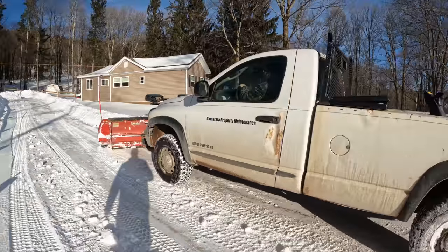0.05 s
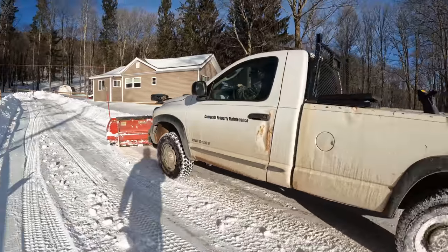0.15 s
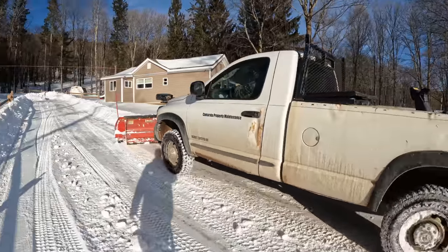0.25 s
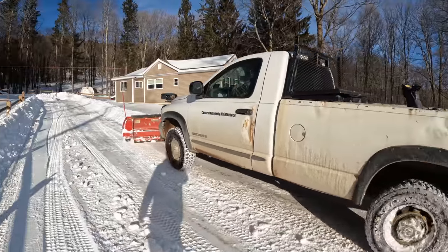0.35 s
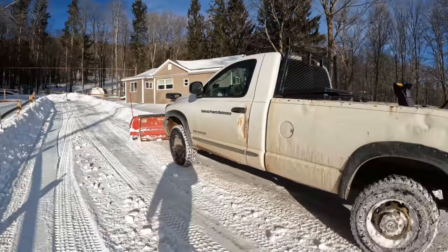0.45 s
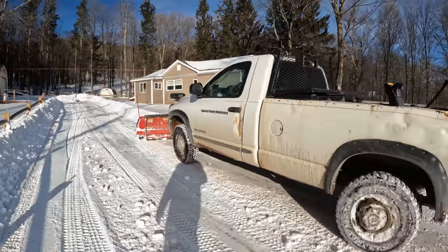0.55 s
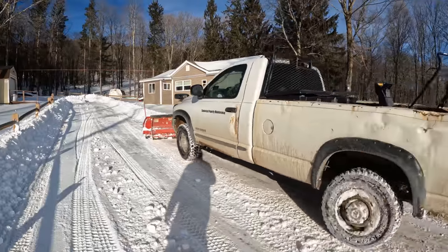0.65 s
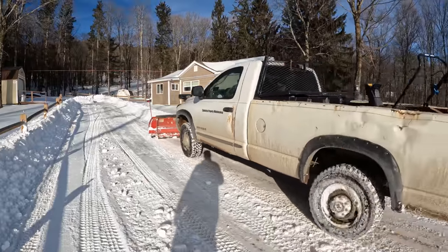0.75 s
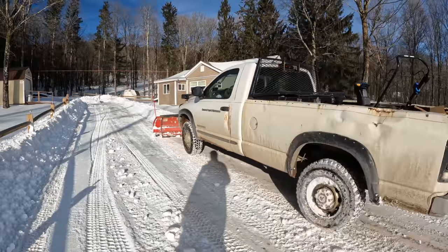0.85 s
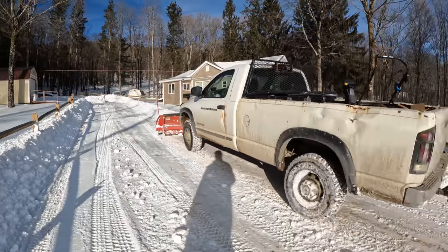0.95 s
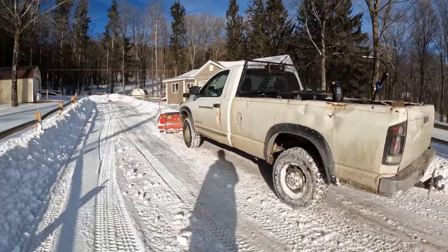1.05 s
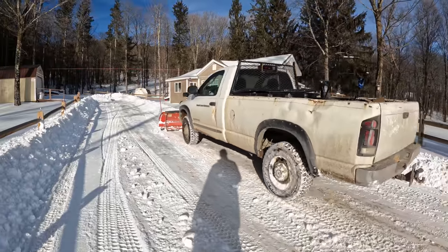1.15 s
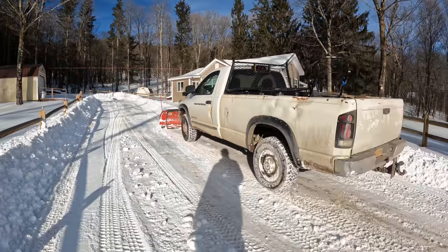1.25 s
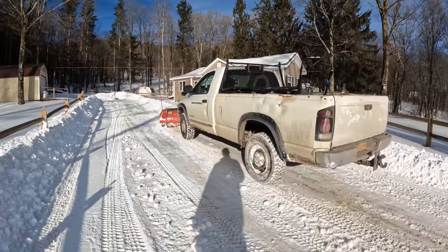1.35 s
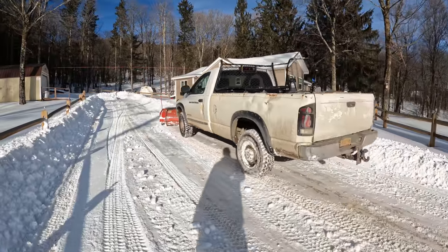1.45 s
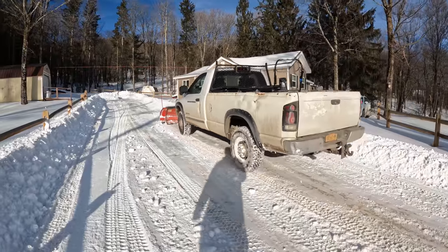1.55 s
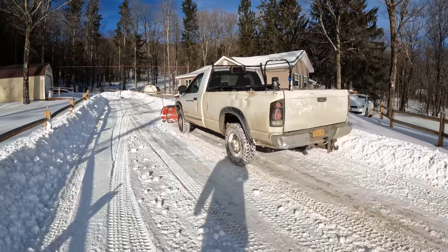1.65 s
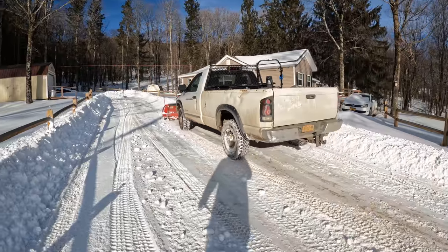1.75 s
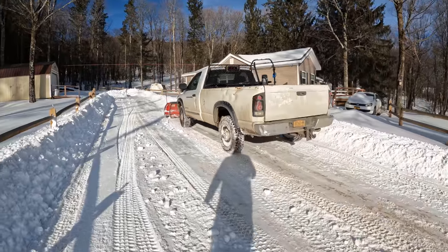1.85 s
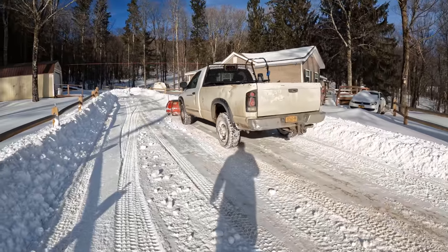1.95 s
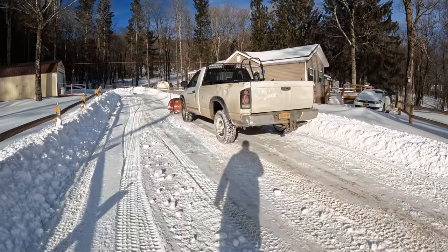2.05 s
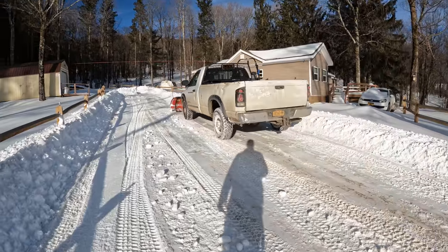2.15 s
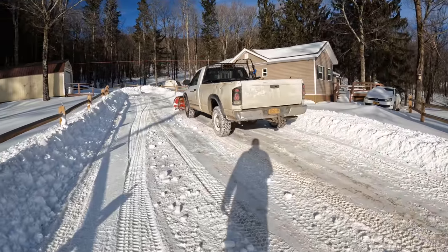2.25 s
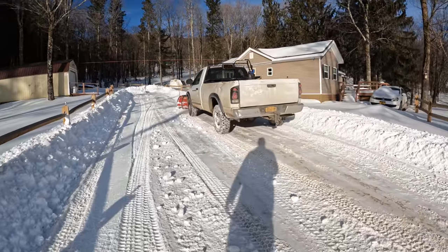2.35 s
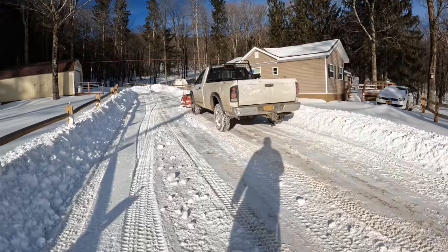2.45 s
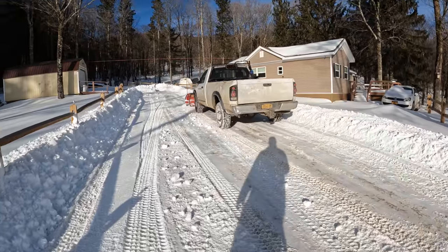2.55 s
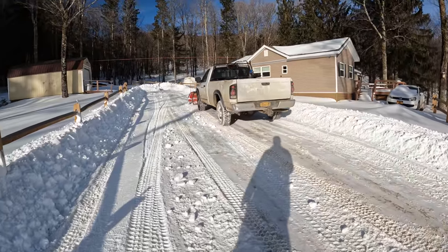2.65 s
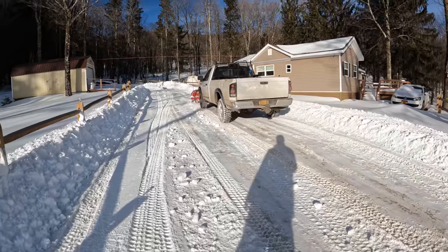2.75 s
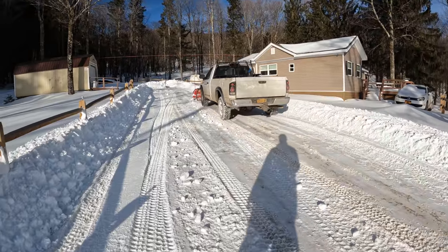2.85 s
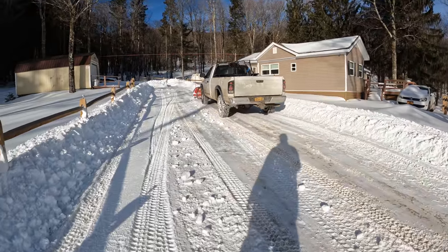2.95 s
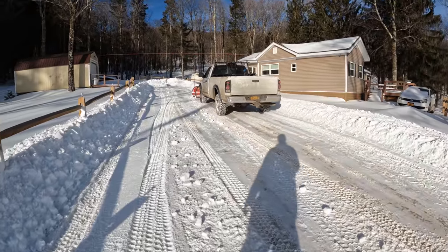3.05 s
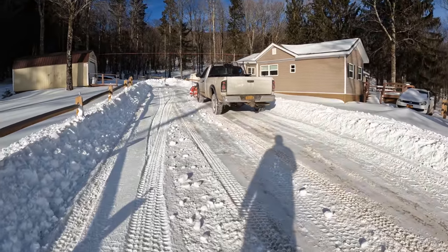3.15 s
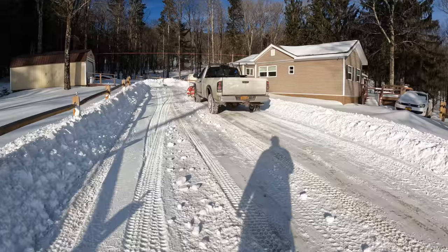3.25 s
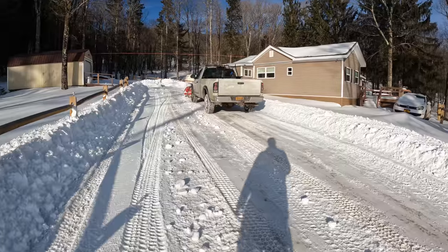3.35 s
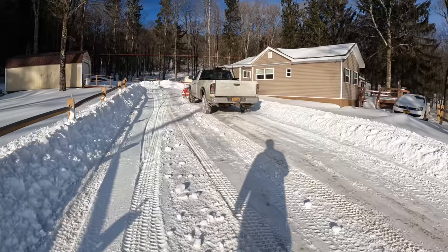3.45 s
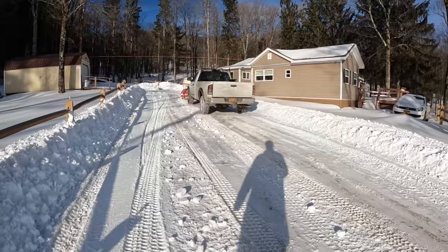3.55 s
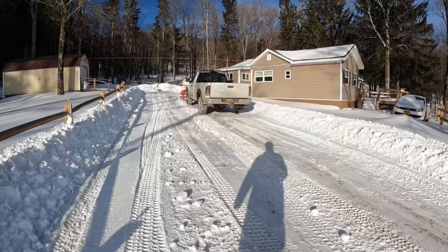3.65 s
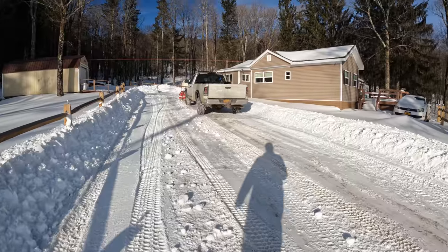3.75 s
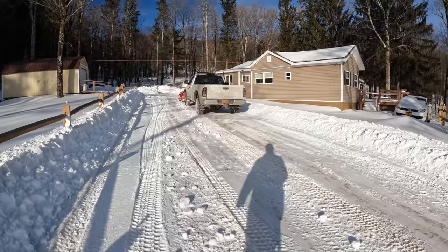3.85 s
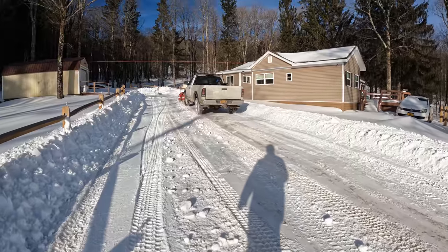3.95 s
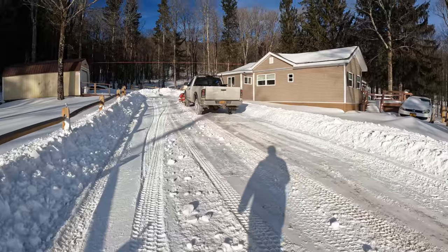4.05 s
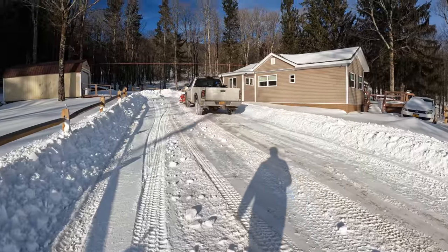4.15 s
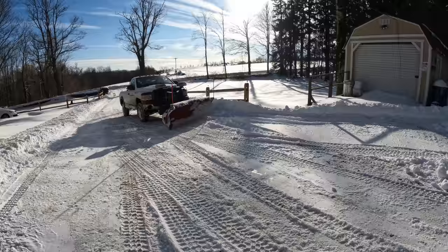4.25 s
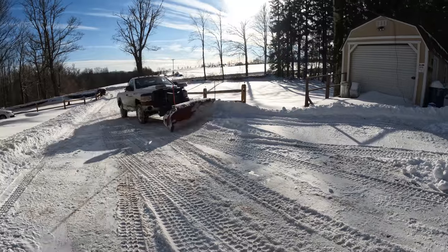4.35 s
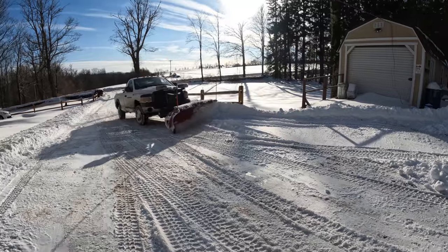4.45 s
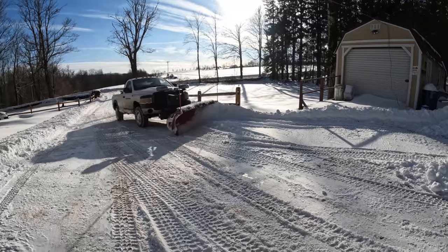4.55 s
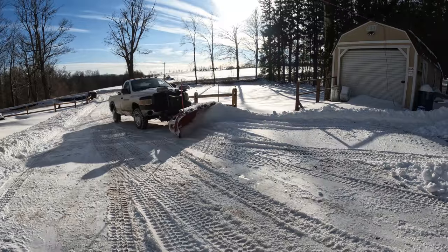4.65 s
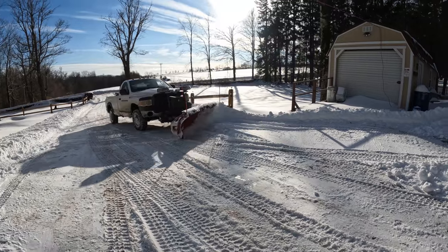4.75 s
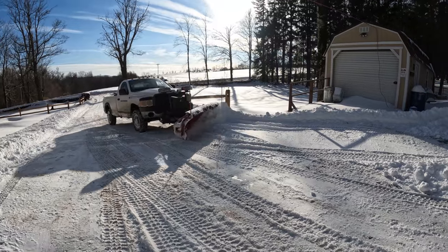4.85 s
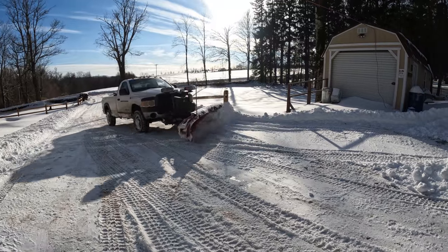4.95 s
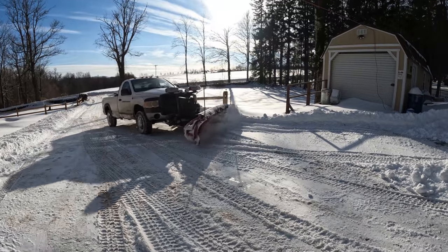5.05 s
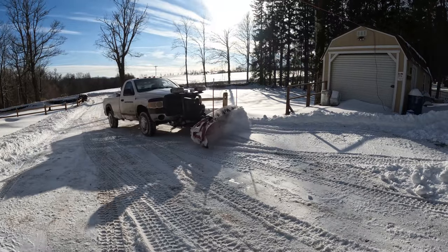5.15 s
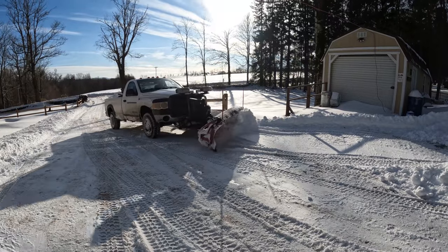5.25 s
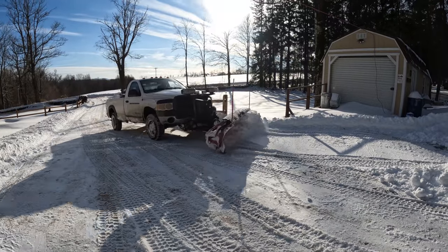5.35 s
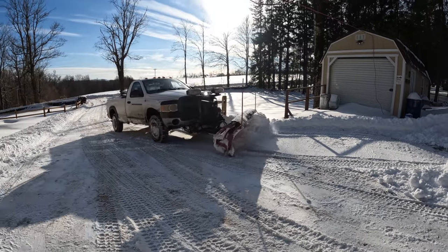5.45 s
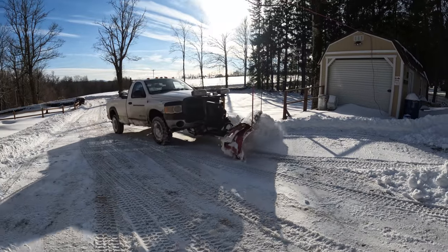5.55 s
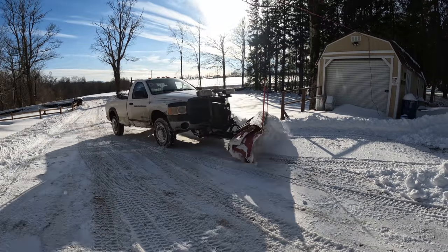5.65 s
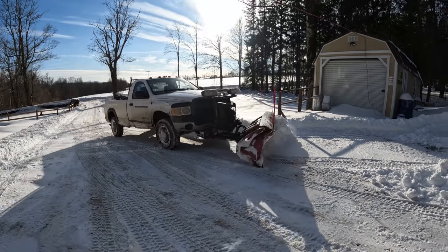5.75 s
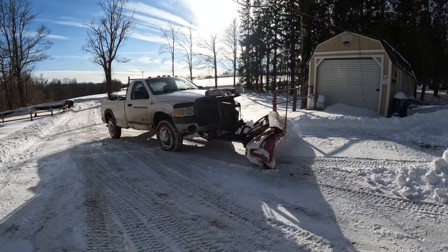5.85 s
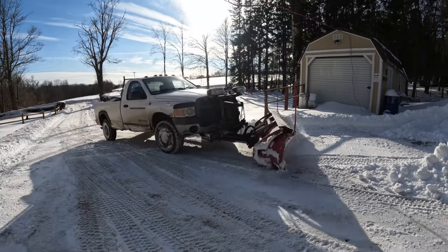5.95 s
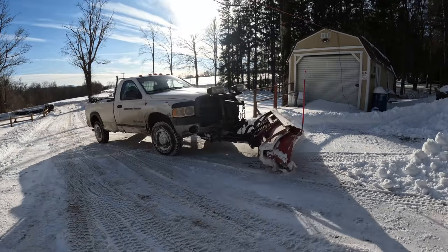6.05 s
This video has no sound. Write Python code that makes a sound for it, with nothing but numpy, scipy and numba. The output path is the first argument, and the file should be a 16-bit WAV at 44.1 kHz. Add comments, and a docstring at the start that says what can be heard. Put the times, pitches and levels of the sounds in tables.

```python
"""A six-cylinder diesel pickup with a snow plow, heard from two spots with a hard cut between them.
From the first spot it pulls past and away up a snowy drive, its tailpipe turning to the listener: tones
on multiples of the engine cycle, with coloured noise for gas, tyres and body. A click marks the cut. At the
second it comes nose first, the blade scraping and clanking over packed snow: gritty bursts, damped steel
tones and snow grains. A microphone pair hears it with a scattered side signal, faint hiss and a cut top."""
import sys
import numpy as np
from scipy import signal
from scipy.fft import rfft, irfft, next_fast_len
from scipy.io import wavfile
from scipy.ndimage import uniform_filter1d
from numba import njit

SR = 44100
rng = np.random.default_rng(int(sys.argv[2]) if len(sys.argv) > 2 else 0)


def generate_wav(signal):
    """Clip the signal to [-1, 1] and save it as 16-bit WAV at the path in sys.argv[1]."""
    frames = np.transpose(np.atleast_2d(signal))
    scaled = np.clip(frames, -1, 1) * 32767
    pcm = np.round(scaled).astype(np.int16)
    wavfile.write(sys.argv[1], SR, pcm)


N = 268569
BINS = next_fast_len(N)  # transform length
CUT_S = 4.307  # end of the first spot

# exhaust note, away and coming: [t/s, firing rate f/Hz, firing tone level/dB]
FIRING_NOTE = [
    [(0, 91.95, -17.5), (.3, 91.9, -16.5), (.8, 93.46, -17), (1.38, 95.04, -14.5), (2, 95.66, -16),
     (3, 95.1, -19), (3.5, 93.6, -20), (3.95, 92.46, -21.5), (4.3, 91.6, -22)],
    [(4.31, 77.36, -30), (4.48, 76.63, -25), (4.8, 78.76, -24), (5.15, 77.43, -23), (5.45, 77.4, -21.5),
     (6.09, 76.7, -21)],
]
# steady overtones: [multiple of the six-firing cycle, away level/dB, coming level/dB re firing tone]
STEADY_OVERTONES = [(3, -29, -26.5), (9, -17, -14), (10, -31, -23), (11, -35, -21), (12, -26, -3),
                    (14, -35.5, -21), (15, -29, -16), (16, -36.5, -19), (18, -41, -17.5), (24, -42.5, -44),
                    (33, -39.5, -34), (40, -50.5, -43), (42, -43, -25.5)]
# overtones swell while the pipe beams them this way:
# [multiple, centre t/s, half length t/s, peak level/dB]
PIPE_BEAMS = [(9, 0.78, 0.25, -22), (9, 2.25, 0.49, -34.5), (9, 3.6, 0.99, -31.5), (12, 0.23, 0.72, -31.5),
              (12, 1.85, 0.55, -34), (12, 4.404, 0.2, -32), (24, 2.04, 0.31, -40.5), (24, 3.3, 0.89, -48),
              (18, 2.25, .6, -49.5), (33, 0.2, 0.15, -37.5), (33, 0.99, 0.22, -41.5), (33, 3.52, 0.76, -41),
              (10, 0.25, 0.56, -32), (11, 0.32, 0.75, -36), (15, 0.59, .6, -40.5), (18, 1.1, 0.28, -39.5),
              (18, 3.2, 0.81, -49), (40, 0.69, 0.45, -42.5), (42, 0.2, 0.11, -37), (42, 1.42, 0.22, -34)]
# uneven cylinders fill in every multiple of the cycle; outline before the lifts below:
# [multiple, level/dB re firing tone]
WEAK_ORDERS_AWAY = [(1, -45.5), (4, -29), (8, -26.5), (16, -27), (20, -50), (26, -38), (34, -43)]
WEAK_ORDERS_COMING = [(1, -45.5), (4, -30), (8, -17.5), (14, -16.5), (17, -26.5), (24, -27)]
FLUTTER_DB, JITTER_RAD = .035, .009  # uneven firings blur an overtone, per multiple
EVEN_DB, THIRD_DB = 4.5, 3  # lift of the weak even multiples, of every weak third multiple
ORDER_SCATTER_DB = 2  # spread from weak multiple to weak multiple
UPPER_FADE_DB_PER_S = 0.5  # weak multiples above twice the firing rate, as the truck leaves

# rush of engine, tyres and blade, away and coming: [t/s, level/dB]
RUSH_LEVEL = [
    [(0.0, -24), (.35, -25.5), (.7, -26.5), (1.3, -28.5), (1.9, -30), (2.53, -34), (3.2, -32), (3.8, -32.5),
     (4.3, -33)],
    [(4.31, -24.5), (4.4, -28.5), (4.78, -28.5), (4.958, -26), (5.434, -27), (5.7, -27.5), (5.82, -25),
     (5.96, -27.5), (6.09, -26)],
]
# colours of the truck's sides as they face the microphones: [f/Hz, relative level/dB per Hz]
FLANK_COLOUR = [(120, -37), (200, -7.5), (258, -16.5), (289, -7.5), (452, -11), (514, -3.5), (575, -9),
                (623, -9), (830, -7.5), (1390, -9), (2430, -15), (2850, -12.5), (3560, -20), (7800, -32.5),
                (9150, -36.5), (11900, -60), (20100, -120)]
QUARTER_COLOUR = [(120, -29), (200, -19.5), (217, -17), (242, -13), (308, -36), (373, -9), (411, -11),
                  (460, -21.5), (539, -14.5), (643, -11.5), (1060, -10), (1200, -9), (2030, -18),
                  (2460, -18), (9150, -45.5), (11900, -67.5), (20100, -120)]
TAIL_COLOUR = [(120, -11), (200, -19), (284, -17), (323, -28.5), (514, -1), (613, -6), (754, 1.5),
               (885, -10.5), (1450, -11.5), (1880, 1), (2200, -19), (2430, -8.5), (3860, -19),
               (5850, -18.5), (9150, -29), (11900, -67.5), (20100, -120)]
NOSE_COLOUR = [(120, -10), (200, -1.5), (267, -8), (356, -14.5), (467, -13.5), (531, -9), (792, -17),
               (944, -10), (1530, -16.5), (2070, -15), (2500, -21.5), (2850, -19.5), (3340, -27),
               (7670, -35), (9150, -38.5), (11900, -61), (20100, -120)]
# colour of the low rumble of ground and body: [f/Hz, relative level/dB per Hz]
RUMBLE_COLOUR = [(15, -24), (30, -2), (55, 4), (110, 3.5), (200, -1), (300, -13), (500, -37), (2000, -110)]
# tailpipe resonances: [f/Hz, width f/Hz before widening, relative level/dB]
PIPE_RESONANCES = [(499, 62, -1.5), (702, 160, -7.5), (1253, 225, -7.5), (1753, 155, -6.5),
                   (1946, 117, -8.5), (2420, 74, -4), (3010, 125, -10.5), (3180, 134, -12.5),
                   (4810, 260, -20.5), (5690, 270, -20)]
# the rumble swells: [centre t/s, half length t/s, peak level/dB]
RUMBLE_HEAVES = [(0.4, 0.57, -36.5), (2.296, 0.21, -32.5), (3.606, 0.99, -34), (4.7, 0.75, -37.5),
                 (5.932, 0.1, -29)]
# hollow roars swell: [centre t/s, half length t/s, peak level/dB, f/Hz]
HOLLOW_ROARS = [(1.3, 0.57, -43, 1350), (2.12, 0.54, -36.5, 1200), (2.65, 0.39, -37.5, 1070),
                (2.3, 0.34, -43, 1720), (2.75, .3, -40, 1880), (3.4, .8, -47.5, 2420),
                (4.64, 0.15, -40, 1020), (4.55, .25, -42.5, 2000), (4.91, 0.17, -34.5, 1050),
                (5.35, 0.39, -39.5, 982)]
# side on (0), over rear quarter (.5), towards tail on (1)
TURN_FROM_S, TURN_TO_S, TURN_END = 0.61, 2.74, 0.9
PIPE_DRIFT, PIPE_WANDER_DB, PIPE_WIDENING = .008, 1.4, 1.9  # resonances slide and flicker
RUMBLE_DB, RUMBLE_FLICKER_DB = -39.5, 1.6
ROAR_FLUTTER_DB, NOSE_SWELL_DB = 2.8, 1.1

# clanks, and at 4.311 a click at the cut between the spots:
# [t/s, nominal peak level/dB, brightness/dB per two octaves, loudest pitch f/Hz, grind length t/s]
CLANKS_AND_CUT_CLICK = [(2.9094, -24, -14, 4750, 0.015), (3.068, -20, -17.5, 3187, 0.008),
                        (3.271, -25, -19, 2430, 0.014), (4.018, -27.5, -4, 3000, 0.016),
                        (4.311, -22.5, -18, 1930, .02), (4.323, -20.5, -18.5, 1990, .025),
                        (4.437, -20, -8, 5000, 0.011), (4.464, -13.5, -11, 5140, .009),
                        (4.476, -14.5, -15, 2950, 0.022), (4.488, -19, -13.5, 1800, .008),
                        (4.515, -29, -9, 5000, .02), (4.624, -28, -11, 2000, 0.024),
                        (4.665, -18.5, -17, 1990, 0.015), (4.79, -20.5, -6.5, 7900, 0.018),
                        (4.832, -19.5, -13, 3954, 0.0085), (4.881, -19, -9, 3860, 0.018),
                        (4.955, -17, -17.5, 1800, 0.022), (4.983, -20, -8, 2910, 0.011),
                        (4.992, -17, -13.5, 4296, .018), (5.002, -16, -16.5, 1840, .012),
                        (5.098, -18, -20, 2076, 0.01199), (5.105, -17, -21, 3900, .012),
                        (5.379, -10, -24, 5554, 0.012), (5.385, -12.5, -18, 2010, 0.011),
                        (5.691, -18, -21, 2154, .008), (5.745, -23, -16, 2757, .012),
                        (5.768, -19.5, -9, 2400, 0.007004), (5.994, -16, -8, 2510, 0.011),
                        (6.001, -12.5, -14, 1628, 0.01), (6.041, -12.5, -14, 3830, 0.014),
                        (6.055, -26, -13, 2996, .006), (6.072, -17, -13, 3900, .01),
                        (6.08, -12.5, -15, 3180, 0.012)]
# steel modes, scattered at each burst: [f/Hz, relative level/dB, t60/s]
STEEL_MODES = [(1063, -7.5, 0.065), (1490, -12.5, 0.084), (1980, 6.5, 0.009), (2850, 3.5, 0.064),
               (3870, -3, 0.056), (4880, 4, 0.044), (5700, -9, 0.061), (7460, -6, 0.053),
               (8600, -14, 0.035)]
# outline of the grit in a burst: [f/Hz, relative level/dB]
GRIT_COLOUR = [(300, -26), (800, -12), (2000, 5), (3500, 7.5), (5500, 6.5), (8000, -5), (9500, -32),
               (16000, -76)]
BURST_RISE_S, BURST_TAIL_S, BURST_TAIL = 0.0008, 0.048, 0.28
CRACK, CRACK_S = 0.35, 0.0012  # sharp start
LOUD_DB, LOUD_OCTAVES = 6, .07  # lift and half width of the loudest pitch
BURST_CREST_DB = 11  # nominal peak over mean level of the grit

# snow crushed and rolled along the blade: [t/s, level/dB]
SNOW_LEVEL = [(4.31, -45), (4.42, -39), (4.48, -38), (4.58, -54), (4.67, -42), (4.75, -39), (4.85, -34),
              (4.95, -34), (5.2, -39), (5.5, -37), (5.72, -38), (5.78, -28), (5.85, -32), (5.92, -34),
              (5.98, -33), (6.03, -25.5), (6.09, -27.5)]
# colour of the crushed snow: [f/Hz, relative level/dB per Hz]
CRUSH_COLOUR = [(200, -38), (400, -12), (600, 6), (900, 2), (1500, -9), (2800, -4), (4200, -10.5),
                (6200, -17), (8500, -46), (16000, -70)]
# ice lumps snap off under the blade edge: [t/s, level/dB before rise and decay]
ICE_SNAPS = [(4.467, -14), (4.4897, -13), (4.9555, -15), (5.003, -15), (5.387, -11), (5.398, -14),
             (5.7695, -11), (5.9955, -9), (6.0428, -8), (6.082, -11)]
SNOW_GRAINS_PER_S, SNOW_SCATTER_DB, SNOW_LUMPS_DB = 6000, 3.5, 2.5
SNAP_HZ, SNAP_T60_S, SNAP_RISE_S = 2600, .0025, .0002

# the blade's hollow note rings when it catches: [t/s, level/dB before rise, decay and scrape, t60/s]
BLADE_RINGS = [(4.466, -18, 0.032), (4.489, -20, 0.035), (4.669, -26, 0.05), (4.802, -23, .08),
               (4.825, -24, .05), (4.855, -27, 0.062), (4.955, -15, 0.081), (4.965, -16, 0.07)]
RING_HZ = 1048  # before each ring's own small detuning
# the blade digs into the bank: [t/s, level/dB before rise and decay]
BANK_THUDS = [(4.503, -8.5), (5.901, -5), (5.939, -2.5)]
THUD_HZ, THUD_T60_S = 137, 0.042
# thin metal squeaks: [centre t/s, peak level/dB]
METAL_SQUEAKS = [(4.798, -43), (4.885, -49), (5.144, -45), (5.276, -43), (5.46, -49)]
SQUEAK_HZ, SQUEAK_HALF_S = 9370, 0.0091

# microphone pair, scattered side signal: [f/Hz, level/dB re mid]
SIDE_WIDTH = [(30, -16), (55, -50), (150, -41), (300, -14), (1000, -15.5), (2500, -14.5), (5000, -10.5),
              (9000, -9), (14000, -8)]
# left minus right, lowest point then the rest: [f/Hz, away level/dB, coming level/dB]
LOW_BALANCE = [(170, 0, 0)]
BALANCE = [(320, 1, -1.6), (1200, -2.5, 0), (5000, -2, -0.33), (9000, 1, 2.5)]
# phase by which left lags right: [f/Hz, phase/rad]
LEFT_LAG = [(170, 0), (400, 0), (1200, 0.29), (3360, 0.74), (6720, 0.11), (10000, 0.26)]
# microphone response: [f/Hz, gain/dB]
MIC_RESPONSE = [(6500, 0.5), (8100, 0.5), (8600, -8), (9300, -4.5), (12300, 13), (13000, 4), (15500, 10)]
HISS_DB, TOP_HZ = -69, 15700


def undb(db):
    """Amplitude ratio of a level in dB."""
    return 10 ** (np.asarray(db) / 20)


def unit(x):
    """Scale to an RMS of 1."""
    return x / np.sqrt(np.mean(x ** 2))


def seconds():
    """Time of every sample."""
    return np.arange(N) / SR


def curves(*tables):
    """Columns of joined tables, one value a sample."""
    s, *columns = np.transpose(np.vstack(tables))
    return [np.interp(seconds(), s, c) for c in columns]


def along(points, column=1):
    """A frequency table read at every bin, on a log frequency axis."""
    hz = np.maximum(np.fft.rfftfreq(BINS, 1 / SR), 1)
    points = np.array(points, float)
    return np.interp(np.log(hz), np.log(points[:, 0]), points[:, column])


def colour(x, points):
    """Shape a spectrum by a table, at an RMS of 1."""
    return unit(irfft(rfft(x, BINS) * undb(along(points)), BINS)[:N])


def walk(rate):
    """Random levels held 1 / rate s and slewed twice; spread near 1."""
    k = int(SR / rate)
    steps = np.clip(rng.standard_normal(N // k + 1), -1.6, 1.6)
    slewed = uniform_filter1d(uniform_filter1d(np.repeat(steps, k), k), k)
    return 1.6 * slewed[:N]


def swell(s, half, db):
    """A bell-shaped rise and fall of amplitude."""
    return undb(db) * np.exp(-((seconds() - s) / half) ** 2)


def knock(s, db, hz, t60, rise):
    """One damped tone with a soft onset."""
    t = np.maximum(seconds() - s, 0)
    decay = np.exp(-np.log(1000) * t / t60)
    return -undb(db) * decay * np.sin(2 * np.pi * hz * t) * (1 - np.exp(-t / rise))


@njit
def svf(x, hz, width):
    """State-variable band-pass with a moving centre, gain 1 there."""
    y, band_state, low_state = np.empty(len(x)), 0., 0.
    for i in range(len(x)):
        g, k = np.pi * hz[i] / SR, width / hz[i]
        g = g * (1 + g * g / 3)  # near tan(g)
        v = (band_state + g * (x[i] - low_state)) / (1 + g * (g + k))
        band_state, low_state, y[i] = 2 * v - band_state, low_state + 2 * g * v, k * v
    return y


def double_band(x, hz, width):
    """The band-pass run twice, for steeper skirts."""
    hz = hz + np.zeros(N)
    return svf(svf(x, hz, float(width)), hz, float(width))


def patchy(shared_db, own_db, crunch_db):
    """Flat noise whose octaves swell together and flicker alone, with snow grains crushed in it."""
    shared, out = walk(16), 0
    grains = undb(crunch_db * np.minimum(rng.exponential(size=N // 64 + 1), 4))
    grain_level = uniform_filter1d(np.repeat(grains, 64), 64)[:N]
    noise = rfft(rng.standard_normal(N) * grain_level, BINS)
    octave = np.log2(np.maximum(np.fft.rfftfreq(BINS, 1 / SR), 1) / 200)
    for k in range(7):
        hump = np.cos(np.pi / 2 * np.clip(octave - k, -1, 1)) ** 2
        out = out + irfft(noise * hump, BINS)[:N] * undb(shared_db * shared + own_db * walk(18))
    return out


def weak_orders(table, cycle, firing_db, away, led):
    """Cylinder differences put faint, wavering tones on the multiples not listed elsewhere."""
    at, outline_db = np.transpose(table)
    tones = np.zeros(N)
    for k in range(1, int(at[-1]) + 1):
        if k in led or k == 6:
            continue
        db = np.interp(np.log(k), np.log(at), outline_db)
        db += THIRD_DB * (k % 3 == 0) + EVEN_DB * (k % 2 == 0)
        db += ORDER_SCATTER_DB * rng.standard_normal()
        db = db - UPPER_FADE_DB_PER_S * (k > 12) * away * seconds()
        drift = rng.uniform(0, 2 * np.pi) + 0.6 * walk(4)
        tones += undb(firing_db + db + 3.2 * walk(4.05)) * np.sin(k * cycle + drift)
    return tones


def exhaust(away):
    """Firings repeat with the engine cycle, giving tones on its multiples; also returns firing phase."""
    hz, firing_db = curves(*FIRING_NOTE)
    cycle = 2 * np.pi * np.cumsum(hz + .1 * walk(12)) / SR / 6  # six firings a cycle
    led = {round(k): undb(firing_db + away * a + (1 - away) * c) for k, a, c in STEADY_OVERTONES}
    for k, s, half, db in PIPE_BEAMS:
        led[round(k)] = led[round(k)] + swell(s, half, db)
    tones = undb(firing_db + .6 * walk(15)) * np.sin(6 * cycle)
    for k, size in led.items():
        flutter = undb((.2 + FLUTTER_DB * k) * walk(18))
        jitter = (.08 + JITTER_RAD * k) * walk(12)
        tones += size * flutter * np.sin(k * cycle + jitter)
    tones += away * weak_orders(WEAK_ORDERS_AWAY, cycle, firing_db, away, led)
    tones += (1 - away) * weak_orders(WEAK_ORDERS_COMING, cycle, firing_db, away, led)
    return np.sqrt(2) * tones, 6 * cycle  # table levels are RMS


def tailpipe(firing):
    """Gas leaves in a puff per firing and excites the drifting pipe resonances."""
    pulse = 1 + 0.34 * np.cos(firing) + 0.25 * np.cos(firing / 2)
    puffs = rng.standard_normal(N) * pulse * undb(0.89 * walk(25.04))
    pipe = 0
    for hz, width, db in PIPE_RESONANCES:
        centre = hz * (1 + PIPE_DRIFT * walk(3))
        level = undb(db + PIPE_WANDER_DB * walk(16))
        pipe = pipe + level * double_band(puffs, centre, PIPE_WIDENING * width)
    return unit(pipe)


def truck_rush(firing, away):
    """Flank, rear quarter, tail and nose each have a noise colour; the first three cross over in turn."""
    (level_db,) = curves(*RUSH_LEVEL)
    (turn,) = curves([(TURN_FROM_S, 0), (TURN_TO_S, TURN_END)])
    flank = colour(patchy(0.53, 0.78, 1.18), FLANK_COLOUR) * (1 + 0.089 * np.cos(firing))
    quarter = colour(patchy(0.42, 0.53, 1.2), QUARTER_COLOUR) * (1 + 0.035 * np.cos(firing))
    tail_air = colour(patchy(0.22, 0.5, 0.62), TAIL_COLOUR) * (1 + 0.17 * np.cos(firing))
    tail = unit(tail_air + undb(2) * tailpipe(firing))
    nose = colour(patchy(NOSE_SWELL_DB, 1.0, 0.36), NOSE_COLOUR)
    leaving = 0
    for at, face in ((0, flank), (.5, quarter), (1, tail)):
        leaving = leaving + np.sqrt(np.clip(1 - 2 * np.abs(turn - at), 0, 1)) * face
    return (away * leaving + (1 - away) * nose) * undb(level_db)


def ground_rumble():
    """Low noise of the ground and body, flickering and swelling."""
    size = undb(RUMBLE_DB) + sum(swell(*row) for row in RUMBLE_HEAVES)
    flicker = undb(RUMBLE_FLICKER_DB * walk(9.9))
    return colour(rng.standard_normal(N), RUMBLE_COLOUR) * flicker * size


def hollow_roars():
    """Coarse-grained noise through narrow bands, each swelling and dying away."""
    air = rng.standard_normal(N) * undb(ROAR_FLUTTER_DB * walk(40))
    return sum(unit(double_band(air, hz, 140)) * swell(s, half, db) for s, half, db, hz in HOLLOW_ROARS)


def clanks_and_cut_click():
    """Clanks are gritty bursts, part of each ringing steel modes; the click at the cut is shaped alike."""
    out, t = np.zeros(N + SR), np.arange(SR // 4) / SR
    hz_bins = np.maximum(np.fft.rfftfreq(len(t), 1 / SR), 1)
    grit_hz, grit_db = np.transpose(GRIT_COLOUR)
    grit = undb(np.interp(np.log(hz_bins), np.log(grit_hz), grit_db))
    lead = 100  # samples of room ahead of the burst
    for s, peak_db, bright_db, loud_hz, grind_s in CLANKS_AND_CUT_CLICK:
        grain_levels = undb(1.8 * rng.standard_normal(len(t) // 60 + 1))
        graininess = uniform_filter1d(np.repeat(grain_levels, 60), 30)[:len(t)]
        # quick rise, a crack, a grinding middle, then a soft tail
        shape = np.exp(-(t / grind_s) ** 2) + CRACK * np.exp(-t / CRACK_S)
        shape = (1 - np.exp(-t / BURST_RISE_S)) * (shape + BURST_TAIL * np.exp(-t / BURST_TAIL_S))
        steel = 0
        for hz, db, t60 in STEEL_MODES:
            level_chance, pitch_chance = rng.standard_normal(2)
            size = undb(db + np.clip(3 * level_chance, -6, 4)) * np.exp(-np.log(1000) * t / t60)
            steel = steel + size * np.sin(2 * np.pi * hz * (1 + 0.025 * pitch_chance) * t)
        body = grit + undb(-34.0) * rfft(steel)
        tilt_db = bright_db * np.clip(np.log2(hz_bins / 1500), -1, 2.3) / 2
        tilt_db = tilt_db + LOUD_DB * np.exp(-(np.log2(hz_bins / loud_hz) / LOUD_OCTAVES) ** 2)
        noise = np.roll(rng.standard_normal(len(t)) * graininess * shape, lead)
        burst = irfft(rfft(noise) * body * undb(tilt_db), len(t))
        burst *= np.sqrt(np.sum(shape ** 2) / np.sum(burst ** 2))  # the energy of the bare shape
        start = max(int(s * SR) - lead, 0)
        out[start:start + len(t)] += burst * undb(peak_db - BURST_CREST_DB)
    return out[:N]


def crushed_snow(away):
    """Snow breaks in grains of very uneven size, arriving in lumps."""
    (level_db,) = curves(SNOW_LEVEL)
    sizes = undb(SNOW_SCATTER_DB * np.minimum(rng.exponential(size=N), 3))
    grains = (rng.random(N) < SNOW_GRAINS_PER_S / SR) * rng.standard_normal(N) * sizes
    lumps = undb(SNOW_LUMPS_DB * walk(35))
    return colour(grains * lumps, CRUSH_COLOUR) * undb(level_db) * (1 - away)


def ice_snaps():
    """Breaking ice gives sharp, very short damped tones."""
    return sum(knock(s, db, SNAP_HZ, SNAP_T60_S, SNAP_RISE_S) for s, db in ICE_SNAPS)


def blade_rings():
    """Short damped rings, each a little off pitch; ice under the edge roughens them."""
    rings = 0
    for s, db, t60 in BLADE_RINGS:
        hz = RING_HZ * (1 + 0.026 * rng.standard_normal())
        rings = rings + knock(s, db, hz, t60, 0.0012)
    return undb(4 * walk(250)) * rings


def thuds():
    """The blade digging in gives dull, low damped knocks."""
    return sum(knock(s, db, THUD_HZ, THUD_T60_S, 0.0015) for s, db in BANK_THUDS)


def squeaks():
    """Short thin metal squeaks: brief swells of one high, unsteady tone."""
    size = sum(swell(s, SQUEAK_HALF_S, db) for s, db in METAL_SQUEAKS)
    return size * np.sin(2 * np.pi * np.cumsum(SQUEAK_HZ + 70 * walk(170)) / SR)


def stereo(mid, balance_db):
    """Add the side signal to left and subtract it from right, with the pair's level and phase offsets."""
    scatter_t = np.arange(SR // 2) / SR
    scatter = rng.standard_normal(SR // 2) * np.exp(-scatter_t / .06)
    scatter /= np.sqrt(np.sum(scatter ** 2))
    side = mid * rfft(scatter, BINS) * undb(along(SIDE_WIDTH))
    lag = np.exp(-.5j * along(LEFT_LAG))
    pairs = []
    for db in balance_db:
        lean = undb(db / 2)
        pairs.append(irfft(np.array([(mid + side) * lag * lean, (mid - side) / lag / lean]), BINS)[:, :N])
    return pairs


def scene():
    """All sounds of both spots as mid, and as side the same sound scattered by banks and walls."""
    away = np.clip((CUT_S - seconds()) / .0001, 0, 1)  # 1 at the first spot, 0 at the second
    tones, firing = exhaust(away)
    truck = tones + truck_rush(firing, away) + ground_rumble() + hollow_roars()
    bursts = clanks_and_cut_click()
    plow = crushed_snow(away) + ice_snaps() + blade_rings() + thuds() + squeaks()
    balance = LOW_BALANCE + BALANCE
    balance_db = (along(balance, column=1), along(balance, column=2))
    leaving, coming = stereo(rfft(truck + bursts + plow, BINS), balance_db)
    return away * leaving + (1 - away) * coming


def record(dry):
    """The microphone dips near 8.6 kHz, lifts the top, hisses faintly, rounds peaks and cuts above TOP_HZ."""
    heard = irfft(rfft(dry, BINS) * undb(along(MIC_RESPONSE)), BINS)[:, :N]
    heard = heard + undb(HISS_DB) * rng.standard_normal(dry.shape)
    rounded = heard / (1 + (heard / .6) ** 6) ** (1 / 6)
    top_cut = signal.ellip(8, .2, 70, TOP_HZ, fs=SR, output="sos")
    return signal.sosfilt(top_cut, rounded)


dry = scene()
out = record(dry)
generate_wav(out)
```